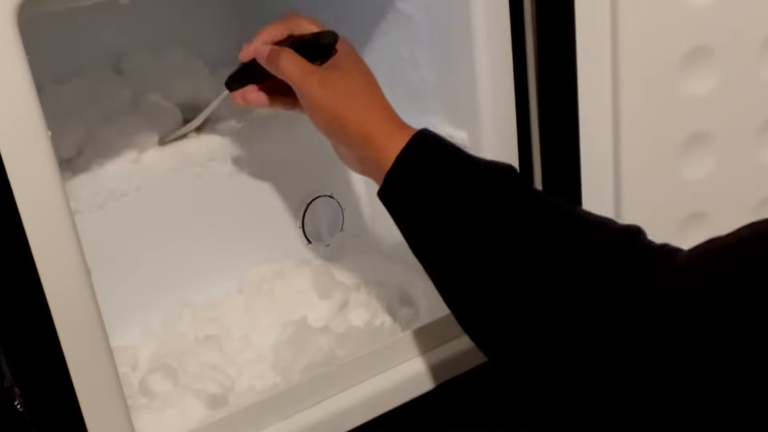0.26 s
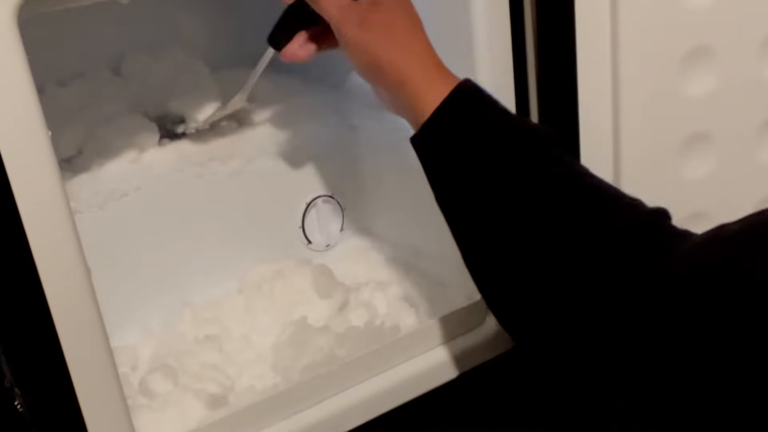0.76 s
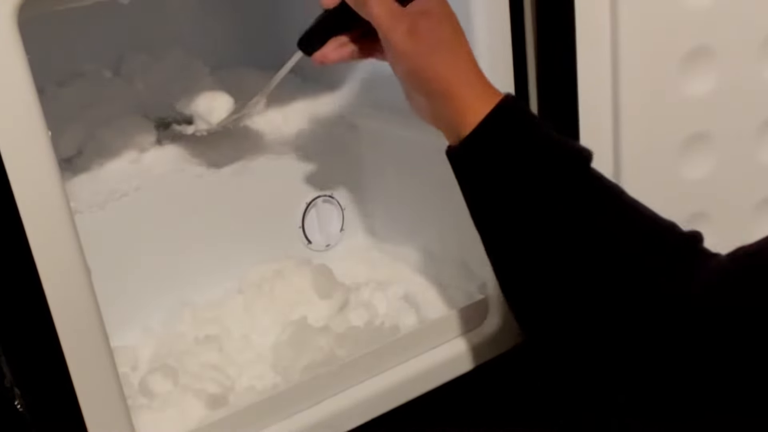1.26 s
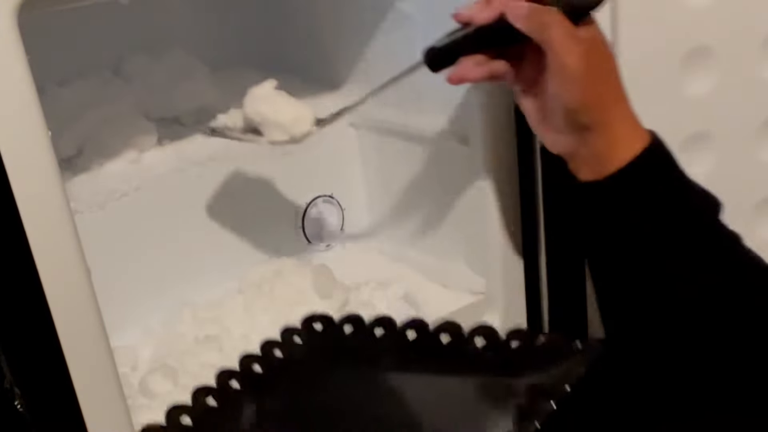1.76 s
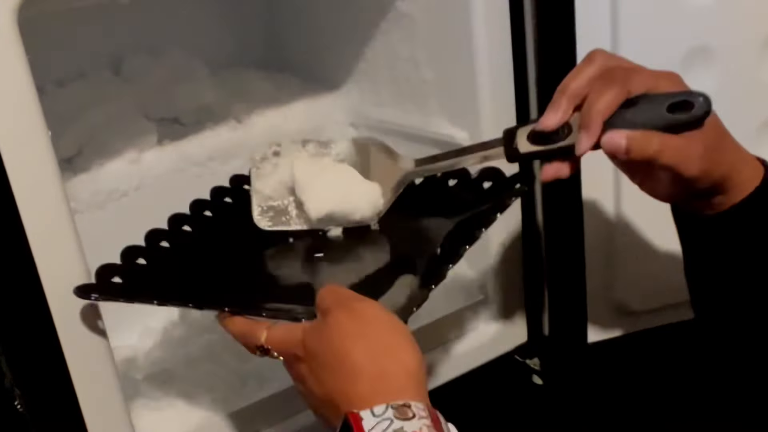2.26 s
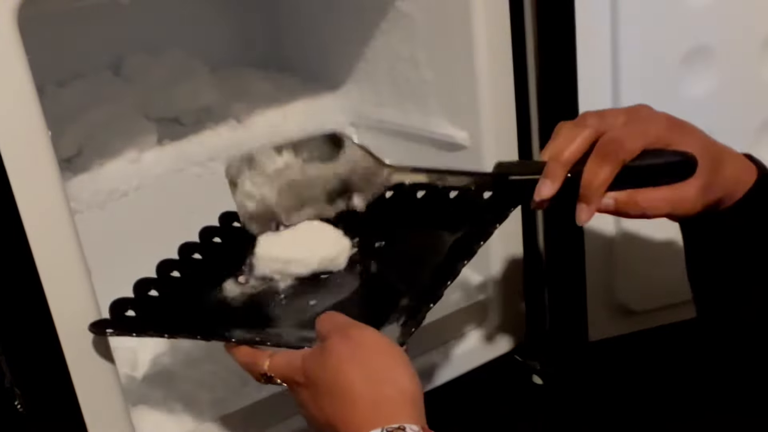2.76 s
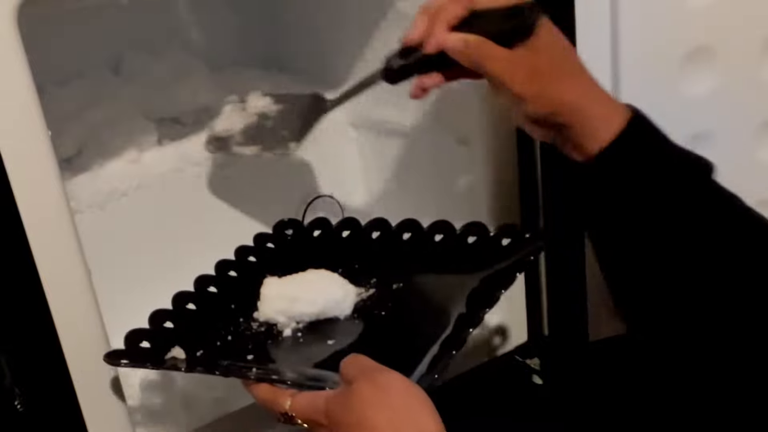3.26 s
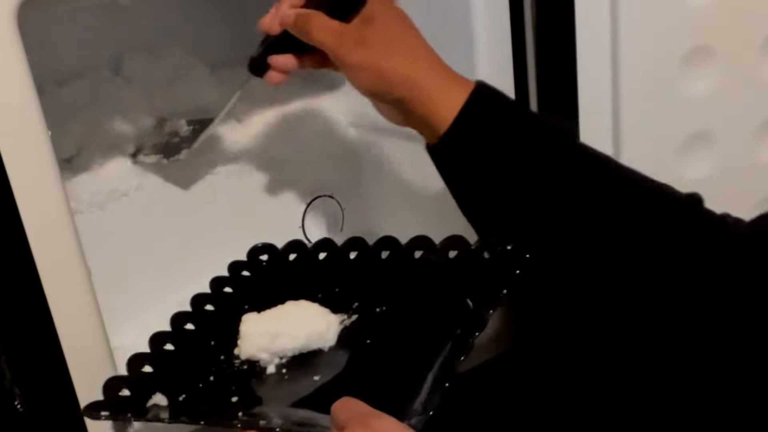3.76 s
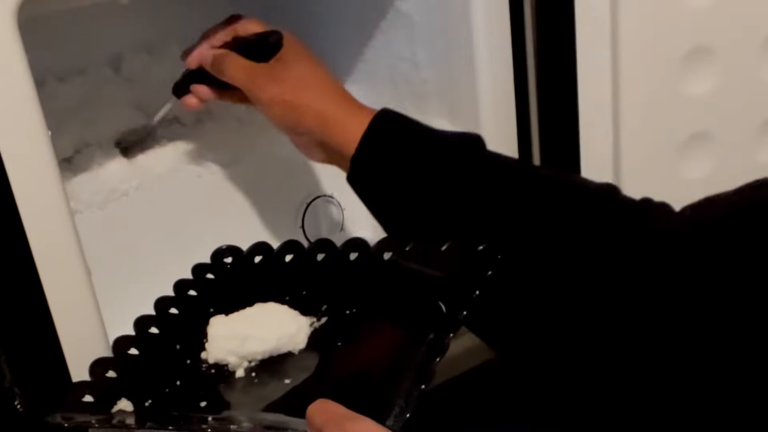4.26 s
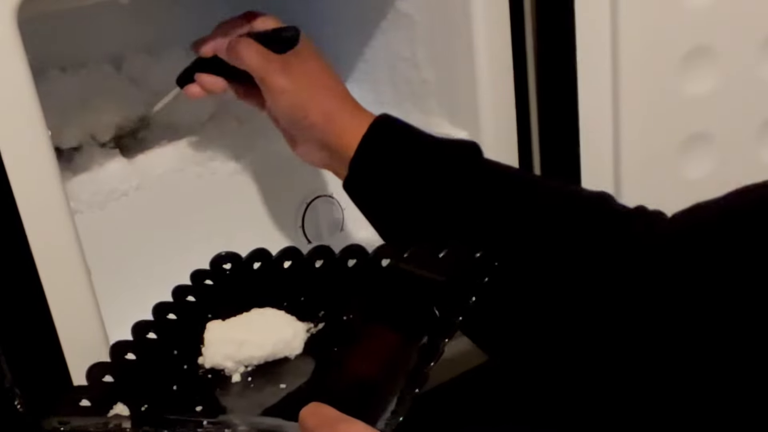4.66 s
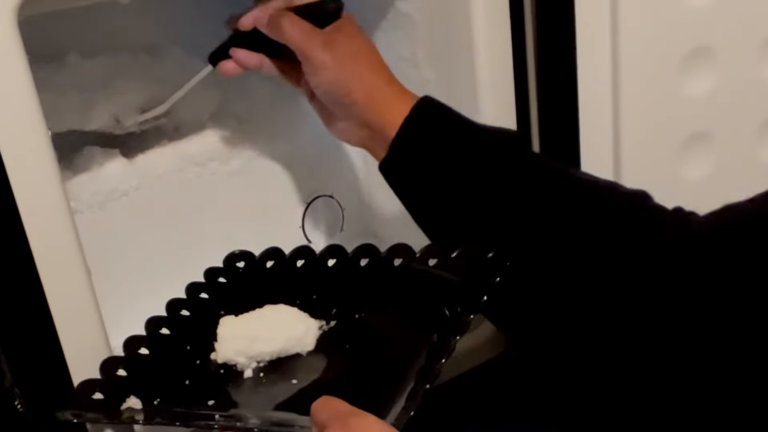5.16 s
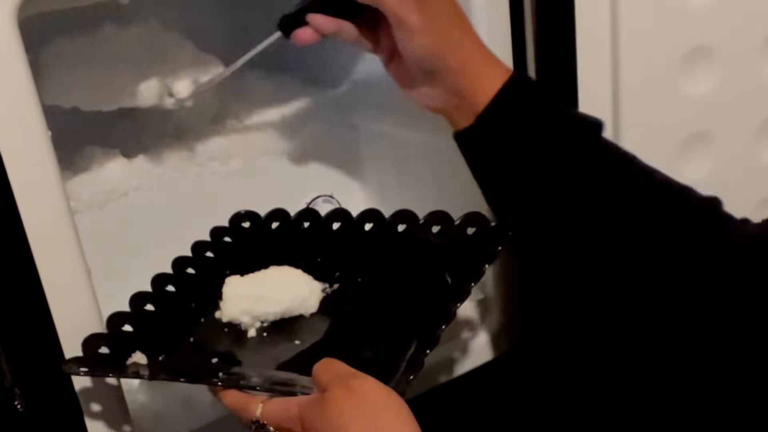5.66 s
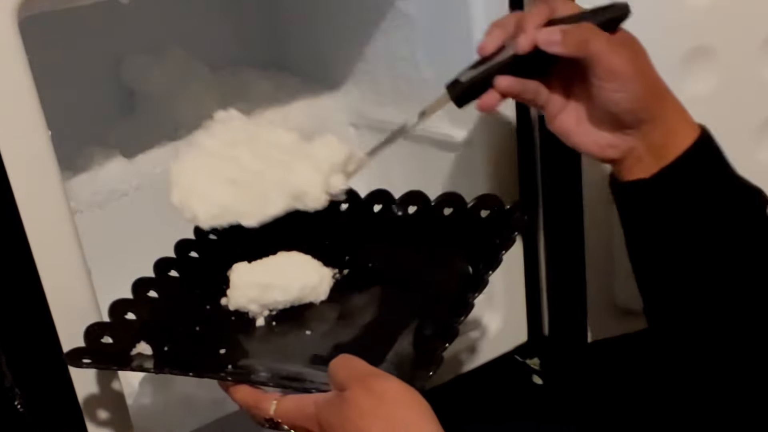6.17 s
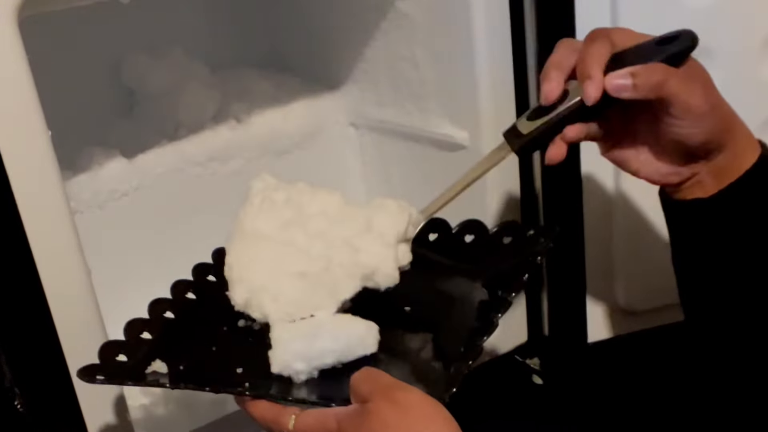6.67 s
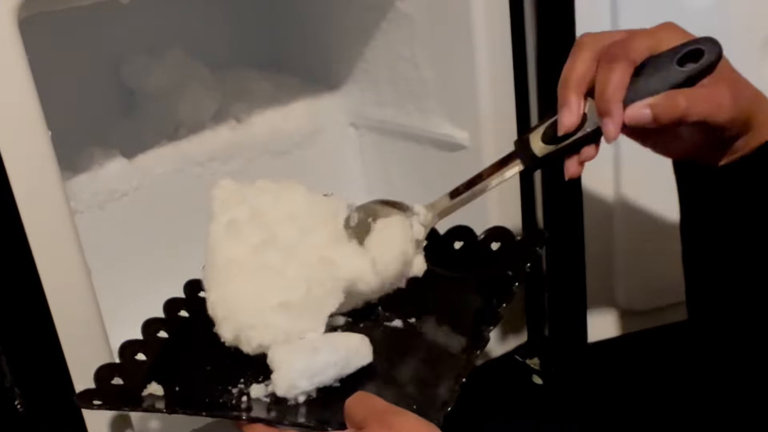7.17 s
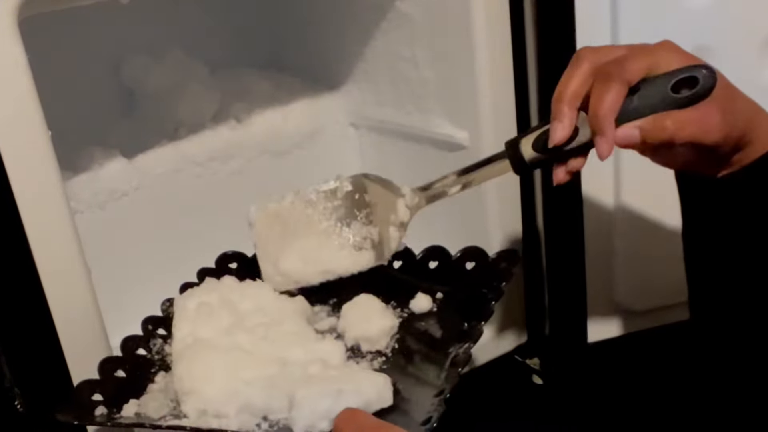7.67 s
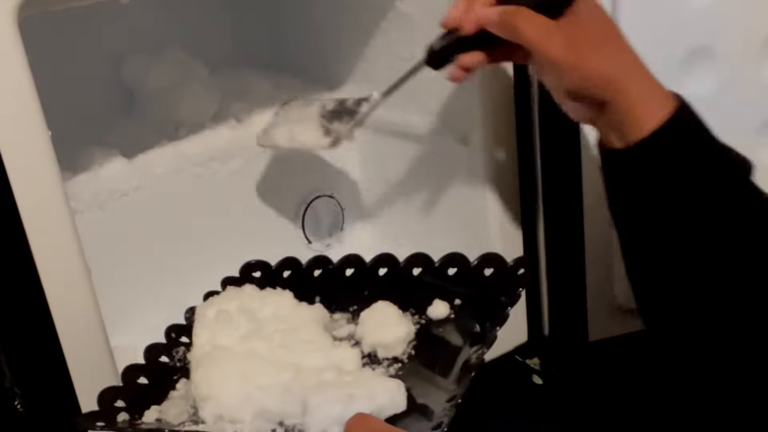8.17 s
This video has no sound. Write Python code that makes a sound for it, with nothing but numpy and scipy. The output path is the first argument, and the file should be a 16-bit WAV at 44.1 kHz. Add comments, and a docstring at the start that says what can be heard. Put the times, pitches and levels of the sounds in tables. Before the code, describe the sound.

Close, rough scrapes through freezer frost with brief metal squeaks alternate with icy lumps clattering onto a plastic tray in a quiet room.

```python
"""Scraping frost from a freezer

A steel spatula scrapes hard frost off a shelf and twice tips its load onto a hand-held plastic tray.
Brittle fracture of thousands of crystals makes the crunch and drives the modes of shelf and tray; the
hollow shelf booms when a slab breaks loose. The blade squeaks by stick-slip friction, sleeves rustle,
a motor hums, a small room reverberates, and the close microphone overloads on the loudest blows."""
import sys
import numpy as np
from scipy import signal
from scipy.fft import rfft, irfft, next_fast_len
from scipy.io import wavfile
from scipy.ndimage import map_coordinates

SR = 44100
rng = np.random.default_rng(int(sys.argv[2]) if len(sys.argv) > 2 else 0)


def master_out(mix):
    """Clip the mix to full scale and print it as 16-bit PCM to the path in sys.argv[1]."""
    frames = np.transpose(np.atleast_2d(mix))
    ceiling = np.clip(frames, -1, 1)
    pcm = np.round(ceiling * 32767).astype(np.int16)
    wavfile.write(sys.argv[1], SR, pcm)


N = 371322

# room rumble and hiss: (frequency [Hz], spectral level [dB])
ROOM_SPECTRUM = [(25, -26.5), (54, 5.5), (100, -4.5), (130, -1.5), (170, -15.5), (260, -16.5), (450, -28.5),
                 (1700, -47.5), (5200, -48), (10000, -62), (11100, -34), (12200, -57), (16000, -61)]
# motor hum: (frequency [Hz], level [dB])
MOTOR_TONES = [(54, -39), (215.3, -44.5), (263.8, -48), (882.9, -61.5)]
# short pushes into the frost:
# (time [s], length [s], crunch [dB], boom re crunch [dB], powder re crunch [dB])
BLADE_PUSHES = [(0.0, 0.038, -22, 3, -6), (0.042, 0.06, -19.5, -8, -4.5), (0.139, 0.061, -17.5, 0, -12),
                (0.295, 0.26, -34.5, 2, -6.5), (0.556, 0.18, -33.5, 0.5, -3.5), (0.799, 0.11, -42.5, 1, -6),
                (1.107, 0.063, -43, 8, 0), (1.256, 0.029, -48.5, -11, 1.5), (3.518, 0.08, -29, -7, -7),
                (3.657, 0.015, -27.5, -7.5, -3.5), (3.728, 0.059, -35, 1, -1), (4.4, 0.12, -36.5, 0, -9),
                (4.531, 0.32, -33, -1, -7), (4.65, 0.064, -31.5, -4, -6.5), (4.953, 0.22, -43.5, 2.5, 1.5),
                (5.16, 0.042, -35, -3, -6.5), (5.273, 0.086, -44, 0.5, 3), (5.517, 0.24, -55, -19, 3)]
# the long stroke under the slab: (time [s], crunch [dB], blade depth [0-1])
DIG_PATH = [(3.77, -26.5, 0.6), (3.87, -23.5, 0.26), (3.98, -22.5, 0.15), (4.04, -19.5, 0.52),
            (4.09, -20, 0.68), (4.2, -21.5, 1), (4.38, -23, 0.83)]
# crusts cracking on the shelf: (time [s], level [dB], powder trim [dB])
CRUST_CRACKS = [(0.154, 12.5, -29), (0.285, -0.5, -23.5), (0.441, -8, -22), (0.754, -23.5, -2),
                (1.122, -27, -2), (1.3, -17.5, -18), (3.507, -17.5, -7.5), (3.527, -4.5, -14),
                (3.778, -4, -16), (4.064, 10.5, -26.5), (4.178, 1, -28), (4.205, 1, -21), (4.27, 2.5, -30),
                (4.331, -2, -27), (4.665, -6, -19), (5.006, -23.5, -6), (5.15, -10, -19),
                (5.612, -34, -4.5), (8.378, -33, -4)]
# shelf resonances: (frequency [Hz], bandwidth [Hz], level [dB])
SHELF_MODES = [(195.2, 23.7, 2.5), (285, 49, -1), (391.3, 36, 3), (438, 44, 3.5), (540, 160, 1.5),
               (666, 140, -2), (1070, 980, -26)]
# coarse ice clicks on the shelf: (frequency [Hz], spectral level [dB])
SHELF_CRUNCH_SPECTRUM = [(200, -24.5), (620, 6), (1150, 8), (2000, 3.5), (3300, 2.5), (6500, -10),
                         (12000, -70)]
# fine ice clicks: (frequency [Hz], spectral level [dB])
POWDER_SPECTRUM = [(2500, -26), (4600, -1), (6100, 0), (8000, -9), (9800, 1.5), (13500, -4), (16000, -31)]
# the hand jolting blade and tray: (time [s], length [s], level [dB])
HAND_JOLTS = [(0, 0.3, -30.5), (1.059, 0.18, -27), (2.096, 0.036, -29), (4.766, 0.12, -27),
              (7.296, 0.06, -18.5)]
# the thump of a jolt: (frequency [Hz], spectral level [dB])
JOLT_SPECTRUM = [(25, -25), (55, 9.5), (130, -7.5), (220, -17), (500, -54), (1500, -120)]
# the blade sticking and slipping: (time [s], length [s], pitch [Hz], level [dB])
BLADE_SQUEAKS = [(0.047, 0.14, 2020, -24.5), (3.825, 0.1, 3320, -24.5), (3.918, 0.06, 3220, -21.5),
                 (3.974, 0.07, 3290, -22.5), (4.043, 0.081, 3275, -22), (4.539, 0.045, 5120, -29)]
# packed snow shearing off or slumping: (time [s], length [s], level [dB], cutoff [Hz])
SNOW_CRUMPS = [(0.149, 0.012, -13, 1900), (0.169, 0.055, -18.5, 1900), (1.02, 0.062, -34.5, 1350),
               (1.111, 0.049, -28.5, 1580), (4.063, 0.014, -20, 1900), (4.378, 0.027, -5.5, 790),
               (7.242, 0.054, -11.5, 2100), (7.301, 0.033, -6, 2100), (7.458, 0.038, -19, 1510),
               (7.749, 0.044, -20.5, 703)]
# collapsing snow: (frequency [Hz], spectral level [dB])
CRUMP_SPECTRUM = [(150, -1), (380, 10), (1100, 7), (3500, -4)]
# rubbing cloth: (frequency [Hz], spectral level [dB])
SLEEVE_SPECTRUM = [(500, 7), (1100, 6), (3400, -5.5), (5400, 0.5), (7500, -14.5)]
# the bare blade on the tray's rim: (time [s], level [dB])
RIM_KNOCKS = [(2.206, -24), (2.219, -9), (2.222, -12.5), (2.234, -11)]
# ringing of blade and rim: (frequency [Hz], level [dB], T60 [s])
RIM_MODES = [(400, 4, 0.04), (1054, -6, .04), (1520, -12, .05), (2640, 0, 0.022), (2850, 0.5, .018)]
# lumps and blade striking the tray: (time [s], level [dB], powder trim [dB])
TRAY_TAPS = [(2.206, -7.5, -21), (2.22, 6, -23.5), (2.37, -20.5, -5), (2.404, 1, -20.5), (2.702, -5, -11),
             (2.711, 0, -11.5), (2.743, 0, -14), (6.251, -9, -30), (6.892, 0.5, -30.5), (7.006, -9.5, -40),
             (7.212, -3, -25), (7.242, 10.5, -19.5), (7.295, 10.5, -18), (7.307, 12, -16.5),
             (7.32, 10.5, -22), (7.336, 5, -17.5), (7.355, 11, -25), (7.429, 0.5, -21), (7.458, 13, -22.5),
             (7.506, 5, -16.5), (7.515, 6, -18), (7.6, -1.5, -25), (7.652, -6.5, -24.5),
             (7.708, -4.5, -8.5), (7.74, -2.5, -4.5), (7.914, -28, 2), (8.044, -20.5, 5.5)]
# frost sliding onto the tray:
# (time [s], rise [s], length [s], crunch [dB], rattle re crunch [dB], powder re crunch [dB])
FROST_SLIDES = [(2.385, 0.0052, 0.016, -31.5, -0.5, 1), (2.48, 0.011, 0.09, -49.5, 12.5, 4),
                (2.693, 0.0096, 0.063, -30.5, -0.5, 6), (2.85, .005, 0.1, -42, 3.5, 1.5),
                (6.242, 0.024, 0.016, -26, 4, -8.5), (6.33, 0.056, 0.99, -36, 0, -3.5),
                (6.39, 0.083, 0.072, -28.5, 0.5, -1.5), (6.63, 0.022, 0.091, -32.5, -21, -5.5),
                (6.86, 0.017, 0.03, -25, 4.5, -2), (7.168, 0.0048, 0.12, -24.5, -5.5, -3.5),
                (7.25, 0.049, 0.13, -16.5, -4, -1), (7.42, 0.022, 0.031, -11, -11, 0.5),
                (7.53, .01, 0.11, -33.5, 7, -5), (7.708, 0.0035, 0.038, -32, 6, -1)]
# tray resonances: (frequency [Hz], bandwidth [Hz], level [dB])
TRAY_MODES = [(128, 11, 6), (199.9, 45, -1), (330.1, 74, 2.5), (495.5, 79, 1.5), (645.4, 70, -1.5),
              (1020, 380, -11.5), (2105.5, 61, -18)]
# coarse ice clicks on the tray: (frequency [Hz], spectral level [dB])
TRAY_CRUNCH_SPECTRUM = [(200, -29.5), (800, -0.5), (1160, 0.5), (1550, -0.5), (2100, -2), (2500, -3.5),
                        (3200, -2.5), (4400, -9), (6500, -10), (12000, -76)]
# soft lumps landing, each on its own spot of the tray: (time [s], pitch [Hz], level [dB])
LUMP_THUDS = [(6.265, 447, -20), (7.242, 435, -3), (7.242, 1164, -4), (7.283, 2040, -7.5),
              (7.296, 399, -0.5), (7.32, 1167, -1.5), (7.466, 372, -1.5), (7.471, 1224, -8),
              (7.509, 370, -7), (7.599, 1140, -22.5), (7.629, 1160, -16), (7.715, 450, -14),
              (7.739, 984, -12), (7.747, 540, -17)]
# reverberation time of the room: (frequency [Hz], T60 [s])
ROOM_DECAY = [(150, 0.47), (1000, 0.26), (7000, 0.38), (14000, 0.26)]
# likeness of left and right: (frequency [Hz], correlation [-1 to 1])
STEREO_CORRELATION = [(60, .92), (190, .85), (680, .12), (1200, .45), (3100, .25), (6500, -.05),
                      (7900, -.5), (9600, .1), (11500, .7), (14800, -.3)]

SLAB_S = 4.379  # the slab breaks loose


def amp(db):
    """Amplitude ratio of a level in decibels."""
    return 10 ** (np.asarray(db) / 20)


def unit(x):
    """Normalisation to rms 1."""
    return x / np.sqrt(np.mean(x ** 2) + 1e-20)


def along(points, hz):
    """Interpolation of (frequency, value) points on a logarithmic frequency axis."""
    f, values = np.transpose(points)
    return np.interp(np.log(hz + 1), np.log(f + 1), values)


def wobble(rate):
    """Slow random modulation: a spline with `rate` knots a second."""
    knots = rng.standard_normal(int(N * rate / SR) + 4)
    return map_coordinates(knots, [np.arange(N) * rate / SR], order=2)


def filtered(x, response):
    """Linear filtering: the spectrum is multiplied by a frequency response."""
    size = next_fast_len(N + SR // 2, True)
    return irfft(rfft(x, size) * response(np.fft.rfftfreq(size, 1 / SR)), size)[..., :N]


def coloured_noise(spectrum):
    """Spectral shaping of white noise: independent mid and side parts, rms 1."""
    return unit(filtered(rng.standard_normal((2, N)), lambda hz: amp(along(spectrum, hz))))


def stroke(start, length, attack, fall_db_per_s):
    """Envelope of one gesture: linear rise, hold and exponential decay."""
    age = np.arange(N) / SR - start
    return np.clip(age / attack, 0, 1) * amp(-np.clip(fall_db_per_s * (age - length), 0, 120))


def effort(strokes, fall_db_per_s):
    """Incoherent addition: overlapping strokes sum in power to gains of body, crunch and powder."""
    shapes = np.array([stroke(s, length, rise, fall_db_per_s) for s, rise, length, *_ in strokes])
    levels = amp([(db + body_db, db, db + powder_db) for *_, db, body_db, powder_db in strokes])
    return np.sqrt(levels.T ** 2 @ shapes ** 2)


def impulse_response(box_db, box_t60, room_db):
    """Reverberation: direct sound, early echoes in the freezer box and the room's tail, mid and side."""
    hz, t, spectra = signal.stft(rng.standard_normal((2, SR // 3)), SR, nperseg=256)
    tail = signal.istft(spectra * amp(-60 * t / along(ROOM_DECAY, hz)[:, None]), SR, nperseg=256)[1]
    t = np.arange(tail.shape[1]) / SR
    box = rng.standard_normal(tail.shape) * amp(-60 * t / box_t60)
    echoes = amp(box_db) * box / np.linalg.norm(box[0]) + amp(room_db) * tail / np.linalg.norm(tail[0])
    return ((t == 0) + echoes) / np.hypot(1, np.linalg.norm(echoes[0]))


def space(x, box_db, box_t60, room_db, size=4096):
    """Time-varying convolution: the blade moves, so each stretch of sound meets new echoes."""
    out, window = np.zeros((2, N + SR)), signal.get_window("hann", size)
    x = np.pad(x, (size // 2, size))
    for start in range(0, N + size // 2, size // 2):
        stretch = window * x[start:start + size]
        if np.abs(stretch).max() > 1e-4:
            heard = signal.fftconvolve([stretch], impulse_response(box_db, box_t60, room_db), axes=1)
            out[:, start:start + heard.shape[1]] += heard
    return out[:, size // 2:][:, :N]


def background(noise_db=-27.5, hum_waver_db=1.5, whine_db=-60, whine_hz=9040, rise_hz_per_s=46):
    """Superposition of room noise, the motor's wavering tones and a thin, slowly rising whine."""
    t = np.arange(N) / SR
    noise = coloured_noise(ROOM_SPECTRUM)
    hum = np.zeros(N)
    for hz, db in MOTOR_TONES:
        peak = np.sqrt(2) * amp(db + hum_waver_db * wobble(3))
        hum += peak * np.sin(2 * np.pi * hz * t + 0.5 * wobble(3.4))
    pitch = whine_hz + rise_hz_per_s * t + 35 * wobble(520)
    whine = np.sin(2 * np.pi * np.cumsum(pitch) / SR)
    return amp(noise_db) * noise + np.array([hum, np.zeros(N)]) + amp(whine_db) * whine


def fractures(per_second, spread_db):
    """Poisson process: crystals break at random moments, many small and few large; rms 1."""
    breaks = rng.random(N) < per_second / SR
    sign = rng.choice([-1, 1], N)
    size = amp(spread_db * np.minimum(rng.standard_normal(N), 2))
    return unit(breaks * sign * size)


def grinding(gains, per_second, clump_db, jerk_db, trims_db, chips_per_second, chips_db, spread_db=4.5):
    """Fracture in avalanches, with stray chips: forces and trims are body, crunch and powder."""
    coarse, fine = fractures(per_second, spread_db), fractures(2 * per_second, spread_db)
    avalanches = unit(amp(clump_db * wobble(170) + jerk_db * wobble(45)))
    chips = amp(chips_db) * fractures(chips_per_second, spread_db)
    return gains * avalanches * np.array([coarse, coarse + chips, fine + chips]) * amp(trims_db)[:, None]


def blows(events, body_db, body_growth, crunch_db, powder_db, edge, crumble_t60, rise=0.00081):
    """Impulsive forces: a push on the panel, growing fastest with strength, a snap and a crumble."""
    forces, t = np.zeros((3, N + SR)), np.arange(SR // 10) / SR
    push = 1. * (t == 0)
    for s, db, trim_db in events:
        crumble = rng.standard_normal(len(t)) * (1 - np.exp(-t / rise)) * amp(-60 * t / crumble_t60)
        burst = (edge * push + crumble / np.linalg.norm(crumble)) / np.hypot(edge, 1)
        body = amp(body_db + body_growth * db) * push
        parts = np.array([body, amp(crunch_db) * burst, amp(powder_db + trim_db) * burst])
        forces[:, round(s * SR):][:, :len(t)] += amp(db) * parts
    return forces[:, :N]


def ring(modes):
    """Modal superposition: a panel answers an impulse with damped sinusoids; energy 1."""
    t, out = np.arange(SR // 4) / SR, np.zeros(SR // 4)
    for k, (hz, width, db) in enumerate(modes):
        out += (-1) ** k * amp(db) * width * np.exp(-np.pi * width * t) * np.sin(2 * np.pi * hz * t)
    return out / np.linalg.norm(out)


def snap(spectrum, size=2048):
    """Minimum phase gives the shortest causal click of a spectrum; energy 1."""
    cepstrum = irfft(np.log(amp(along(spectrum, np.fft.rfftfreq(size, 1 / SR)))))
    causal = np.r_[cepstrum[0], 2 * cepstrum[1:size // 2]]
    click = irfft(np.exp(rfft(causal, size)))
    return click / np.linalg.norm(click)


def radiate(forces, modes, crunch_spectrum):
    """Convolution: the three forces sound as panel ringing, coarse clicks and fine clicks."""
    responses = ring(modes), snap(crunch_spectrum), snap(POWDER_SPECTRUM)
    return sum(signal.oaconvolve(force, response)[:N] for force, response in zip(forces, responses))


def dig(attack=0.0018, slab_boom_db=-2.5):
    """Coupling grows with blade depth: more boom and less powder, until the slab breaks loose."""
    times, *columns = np.transpose(DIG_PATH)
    crunch_db, depth = (np.interp(np.arange(N) / SR, times, column) for column in columns)
    boom_db, powder_db = crunch_db - 7 + 14 * depth, crunch_db - 3 * depth
    envelope = stroke(times[0], SLAB_S - times[0], attack, fall_db_per_s=300)
    gains = amp([boom_db, crunch_db, powder_db]) * envelope
    gains[0] += amp(slab_boom_db) * stroke(SLAB_S, 0.021, attack, fall_db_per_s=340)
    return gains


def shelf(attack=0.00053, slab_crack_db=6.5, slab_powder_db=-38):
    """Forced vibration: frost fracturing under the blade drives the hollow shelf."""
    pushes = [(s, attack, *rest) for s, *rest in BLADE_PUSHES]
    gains = np.hypot(effort(pushes, fall_db_per_s=141), dig())
    forces = grinding(gains, per_second=3200, clump_db=1.5, jerk_db=0.32, trims_db=(4, 2, 2.5),
                      chips_per_second=150, chips_db=-12)
    forces += blows([*CRUST_CRACKS, (SLAB_S, slab_crack_db, slab_powder_db)], body_db=2,
                    body_growth=0.103, crunch_db=8.5, powder_db=23.5, edge=0.15, crumble_t60=0.032)
    scrape = radiate(forces, SHELF_MODES, SHELF_CRUNCH_SPECTRUM)
    return space(scrape, box_db=-1.5, box_t60=0.032, room_db=-5)


def jolts(attack=0.014, fall_db_per_s=150):
    """Low-frequency transients: dull thumps as the hand jerks or the tray takes the load."""
    load = sum(amp(db) * stroke(s, length, attack, fall_db_per_s) for s, length, db in HAND_JOLTS)
    return load * coloured_noise(JOLT_SPECTRUM)


def squeaks(rough_db=3.5, waver=0.035):
    """Stick-slip friction briefly locks onto a mode of the blade, never quite steadily."""
    t, out = np.arange(N) / SR, np.zeros(N)
    drift = 1 + waver * wobble(500)
    rasp = unit(amp(rough_db * wobble(120)))
    for s, length, hz, db in BLADE_SQUEAKS:
        on = (t > s) & (t < s + length)
        swell = np.sqrt(2 * np.abs(np.sin(np.pi * (t[on] - s) / length)))
        out[on] += amp(db) * swell * rasp[on] * np.sin(2 * np.pi * hz * np.cumsum(drift[on]) / SR)
    return out


def crumps(per_second=3000, attack=0.0023):
    """Collective fracture: many bonds in a lump of snow fail at once, muffled above its cutoff."""
    t, out = np.arange(SR // 4) / SR, np.zeros(N)
    bonds, hz = fractures(per_second, spread_db=2), np.fft.rfftfreq(len(t), 1 / SR)
    for s, length, db, cutoff_hz in SNOW_CRUMPS:
        colour = amp(along(CRUMP_SPECTRUM, hz)) / np.hypot(1, (hz / cutoff_hz) ** 6)
        crunch = unit(irfft(rfft(bonds[round(s * SR):][:len(t)]) * colour, len(t)))
        envelope = (1 - np.exp(-t / attack)) * np.exp(-np.minimum(t / length, 5) ** 4)
        out[round(s * SR):][:len(t)] += amp(db) * crunch * envelope
    return space(out, box_db=-5, box_t60=0.011, room_db=-18)


def sleeves(level_db=-48.5, uneven_db=0.7):
    """Friction noise: cloth brushes unevenly on cloth while the tray is lifted into place."""
    rub = stroke(start=1.423, length=0.95, attack=0.081, fall_db_per_s=80)
    return rub * amp(level_db + uneven_db * wobble(11.9)) * coloured_noise(SLEEVE_SPECTRUM)


def knocks():
    """Damped free vibration: steel meets the tray's rim and both ring briefly in the hands."""
    t, out = np.arange(SR // 4) / SR, np.zeros(N)
    for s, db in RIM_KNOCKS:
        for hz, mode_db, t60 in RIM_MODES:
            envelope = amp(db + mode_db + rng.standard_normal() - 60 * t / t60)
            out[round(s * SR):][:len(t)] += envelope * np.sin(2 * np.pi * hz * t)
    return out


def tray():
    """Impact excitation: lumps slide off the blade, crumble and drive the plastic tray's modes."""
    gains = effort(FROST_SLIDES, fall_db_per_s=211)
    forces = grinding(gains, per_second=1800, clump_db=2, jerk_db=1.58, trims_db=(1.5, 2.5, 1.5),
                      chips_per_second=54, chips_db=-15.5)
    forces += blows(TRAY_TAPS, body_db=7, body_growth=0.1, crunch_db=12.5, powder_db=25,
                    edge=0.35, crumble_t60=0.013)
    rattle = radiate(forces, TRAY_MODES, TRAY_CRUNCH_SPECTRUM)
    return space(rattle, box_db=1, box_t60=0.022, room_db=0.5)


def thuds(rise=0.00284):
    """Contact damping: a soft lump presses the tray and quickly deadens it."""
    t, out = np.arange(SR // 20) / SR, np.zeros(N)
    envelope = t / rise * np.exp(1 - t / rise)
    for s, hz, db in LUMP_THUDS:
        out[round(s * SR):][:len(t)] += amp(db) * envelope * np.sin(2 * np.pi * hz * t)
    return space(out, box_db=-9, box_t60=0.025, room_db=-11)


def microphone_ports(hz):
    """Phase difference: two ports hear bass alike and treble out of step; gains of mid and side."""
    angle = np.arccos(np.clip(along(STEREO_CORRELATION, hz), -1, 1)) / 2
    return np.array([np.cos(angle), 1j * np.sin(angle)])


def scene():
    """Superposition: the sources add as mid and side, whose sum and difference are left and right."""
    frost = shelf() + tray()
    blade = space(squeaks() + knocks(), box_db=-8, box_t60=0.025, room_db=-11)  # mostly direct sound
    sources = frost + blade + crumps() + thuds() + jolts() + sleeves() + background()
    mid, side = filtered(sources, microphone_ports)
    return np.array([mid + side, mid - side])


def record(dry, hardness=6, top_hz=15800):
    """Saturation and band limiting: the loudest peaks flatten, and nothing passes above top_hz."""
    clipped = dry / (1 + np.abs(dry) ** hardness) ** (1 / hardness)
    return filtered(clipped, lambda hz: hz < top_hz)


dry = scene()
out = record(dry)
master_out(out)
```